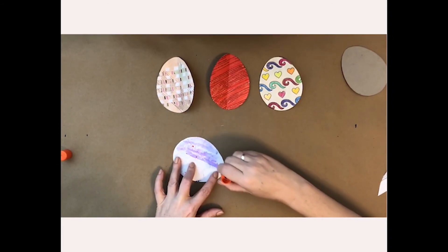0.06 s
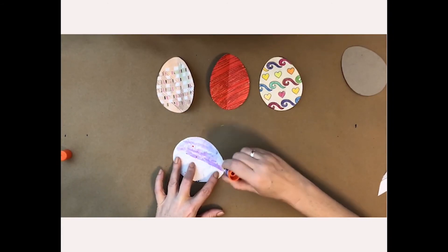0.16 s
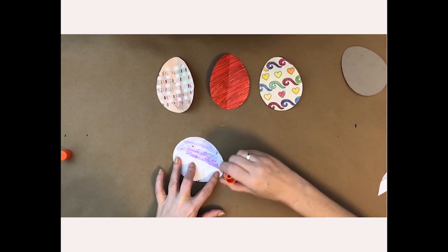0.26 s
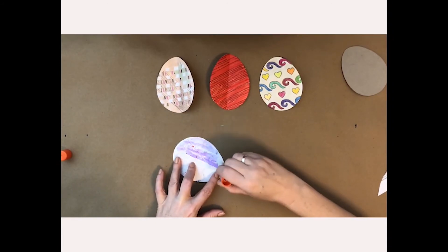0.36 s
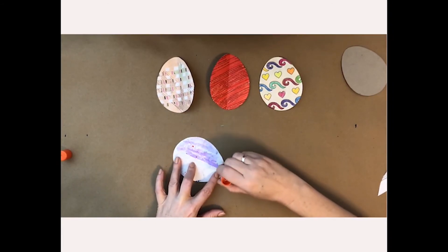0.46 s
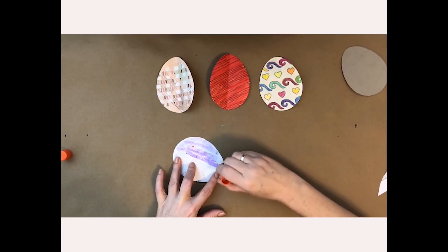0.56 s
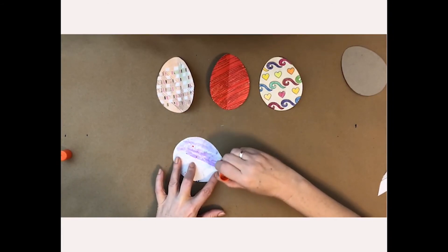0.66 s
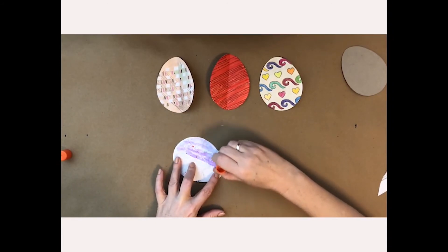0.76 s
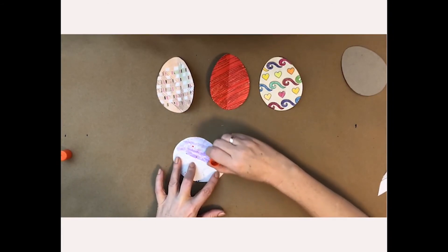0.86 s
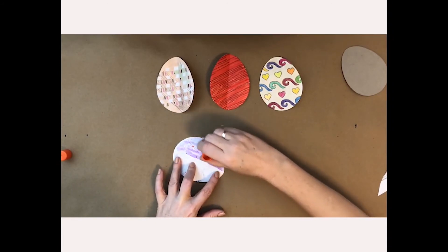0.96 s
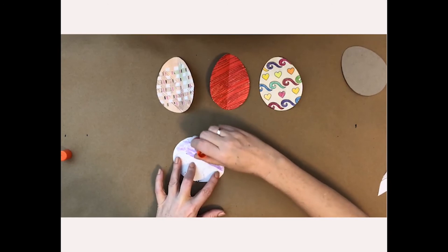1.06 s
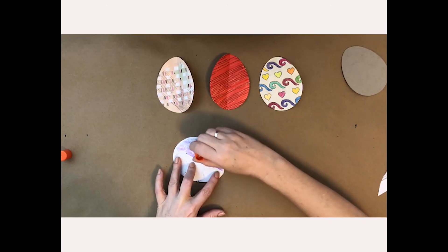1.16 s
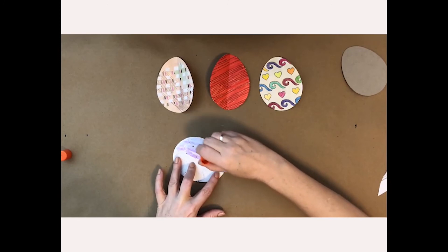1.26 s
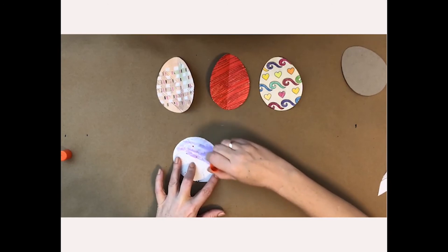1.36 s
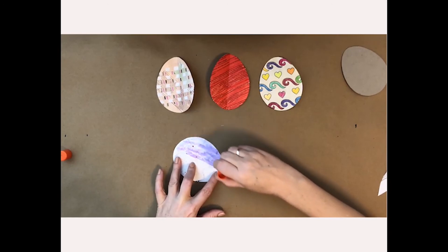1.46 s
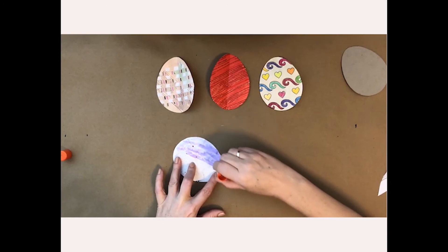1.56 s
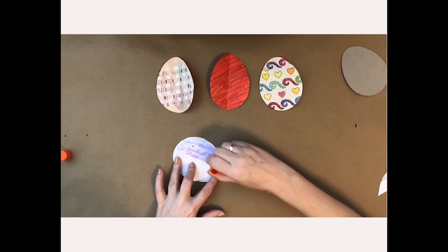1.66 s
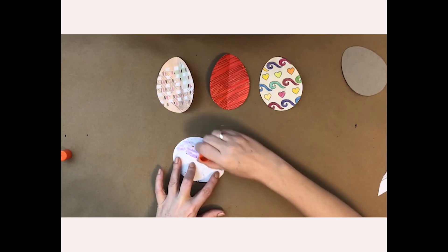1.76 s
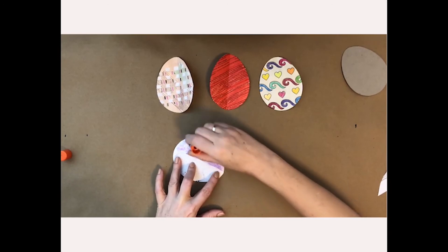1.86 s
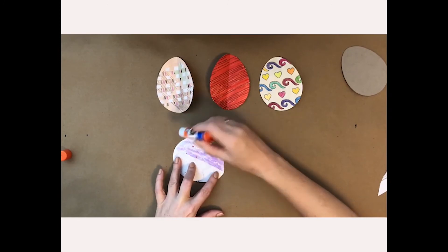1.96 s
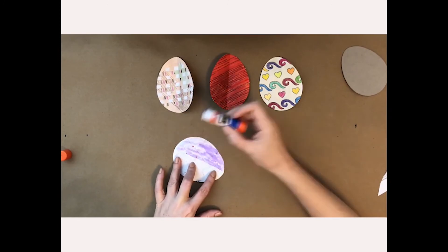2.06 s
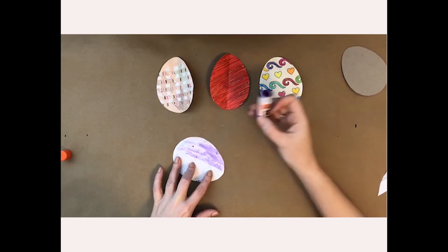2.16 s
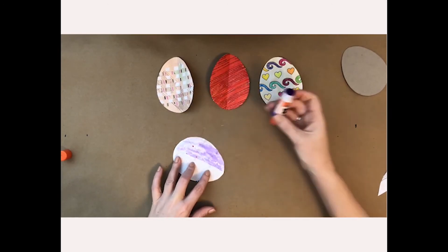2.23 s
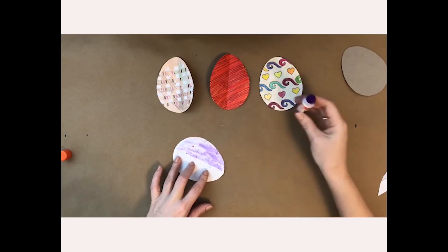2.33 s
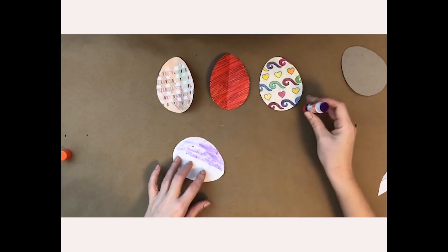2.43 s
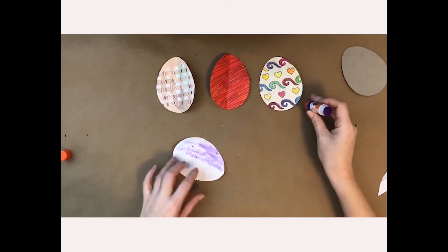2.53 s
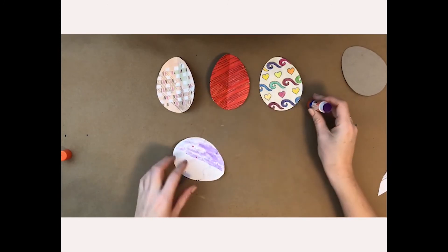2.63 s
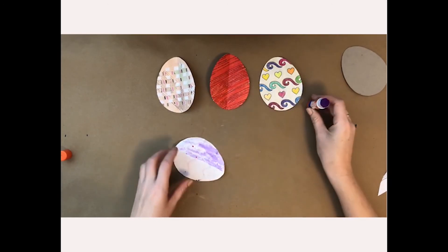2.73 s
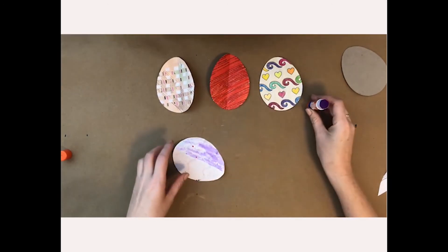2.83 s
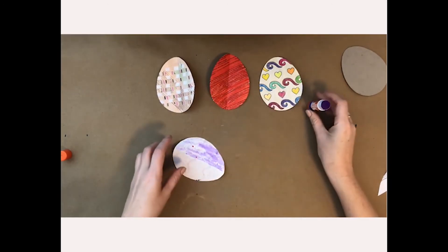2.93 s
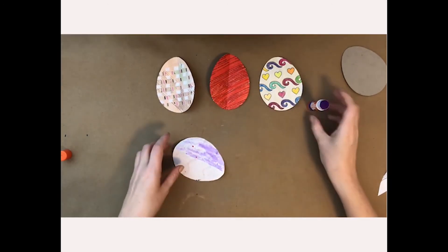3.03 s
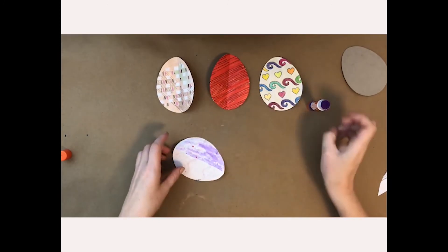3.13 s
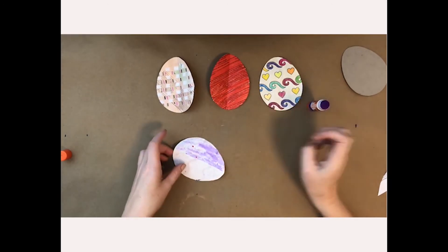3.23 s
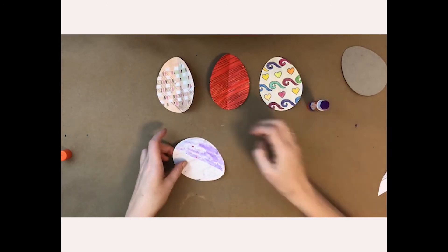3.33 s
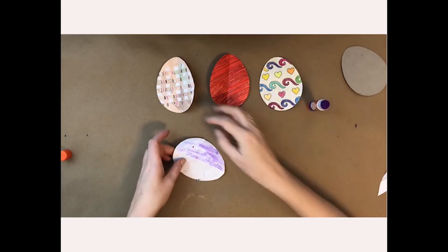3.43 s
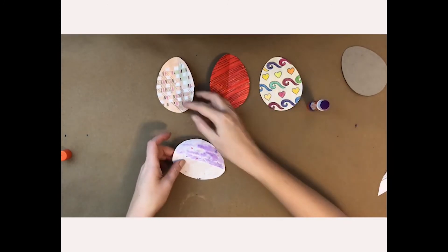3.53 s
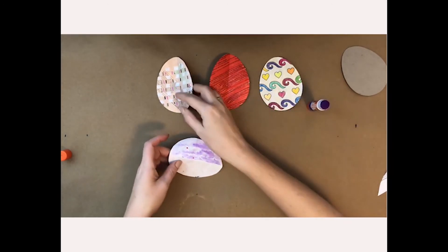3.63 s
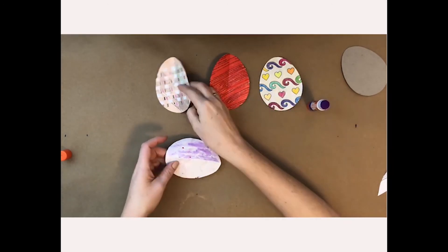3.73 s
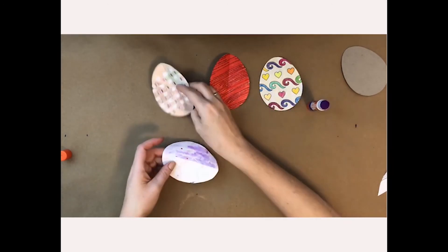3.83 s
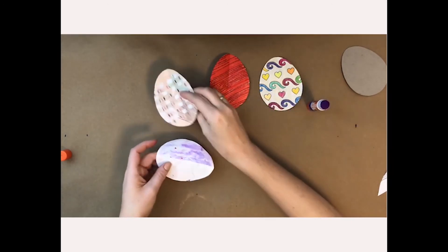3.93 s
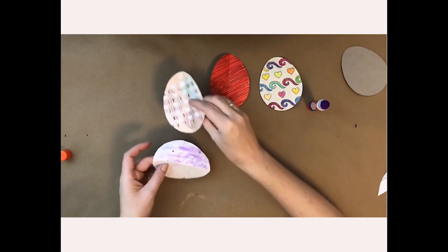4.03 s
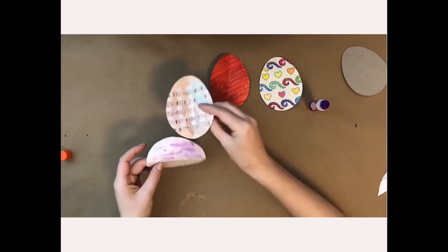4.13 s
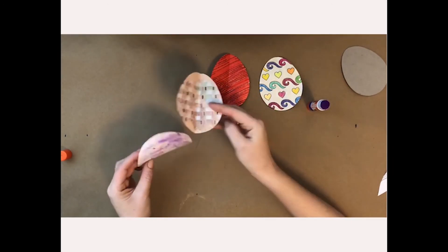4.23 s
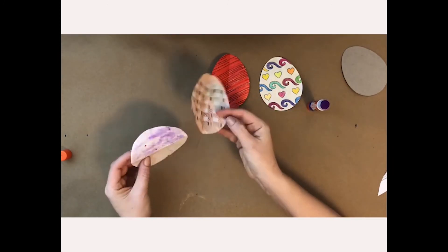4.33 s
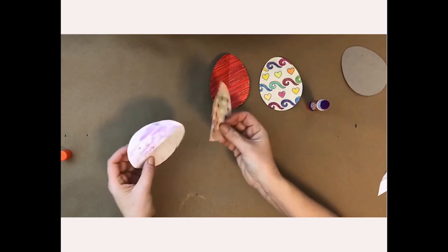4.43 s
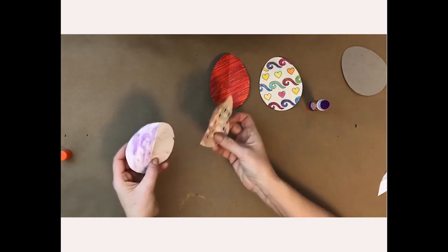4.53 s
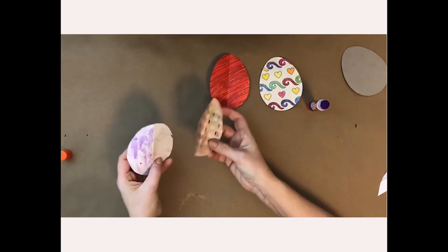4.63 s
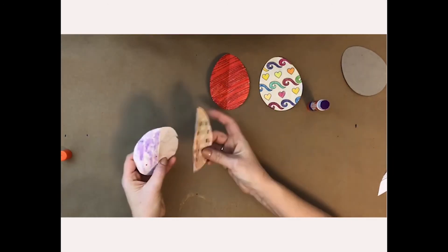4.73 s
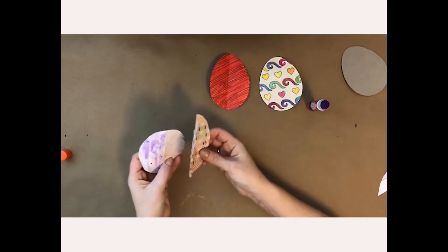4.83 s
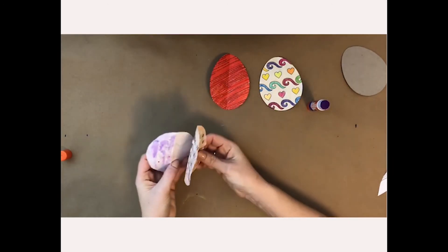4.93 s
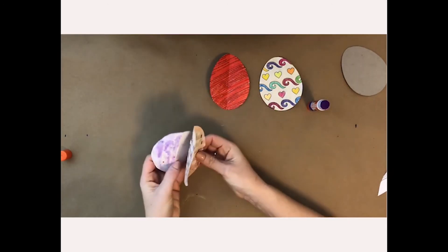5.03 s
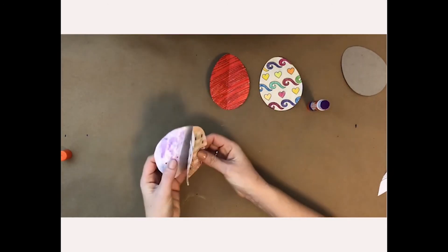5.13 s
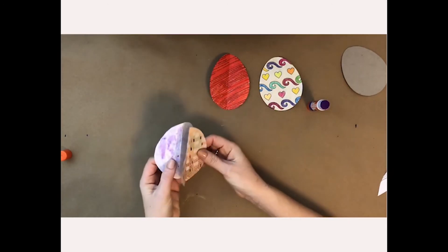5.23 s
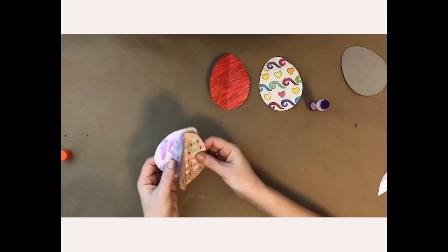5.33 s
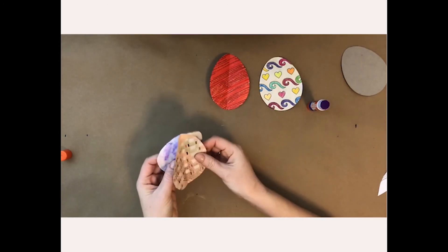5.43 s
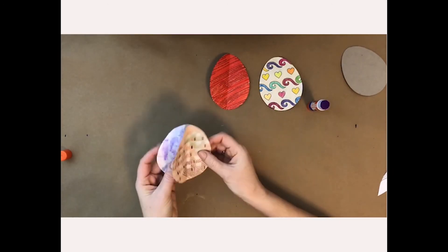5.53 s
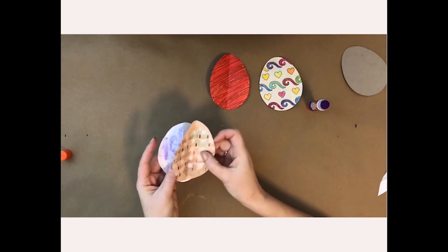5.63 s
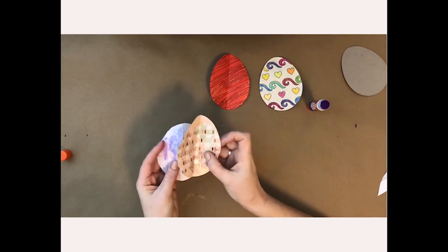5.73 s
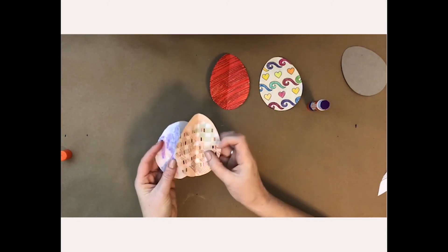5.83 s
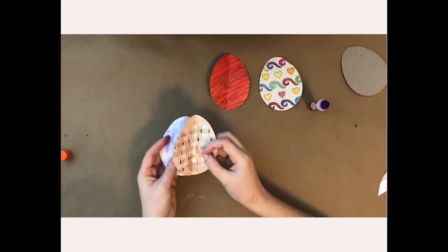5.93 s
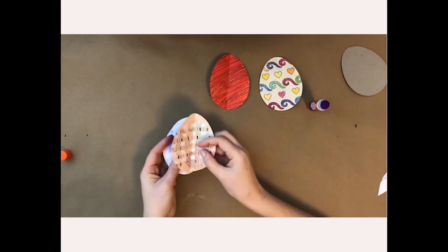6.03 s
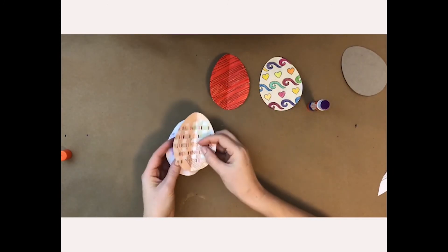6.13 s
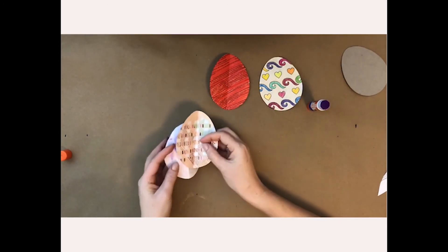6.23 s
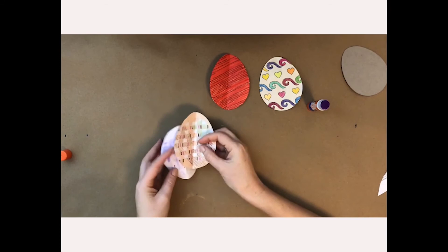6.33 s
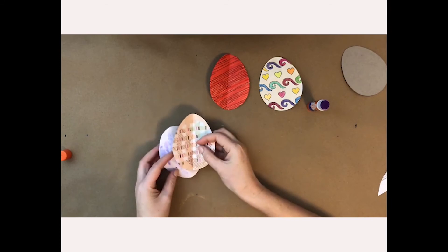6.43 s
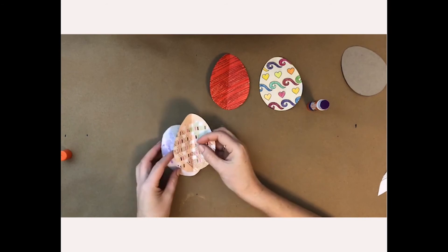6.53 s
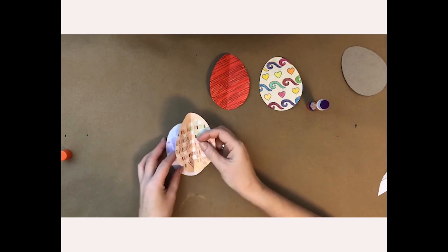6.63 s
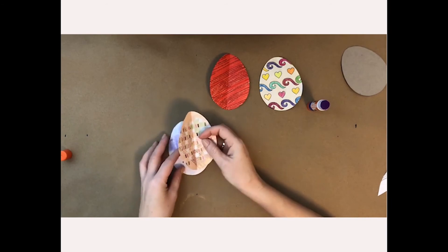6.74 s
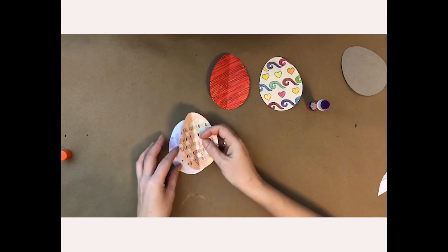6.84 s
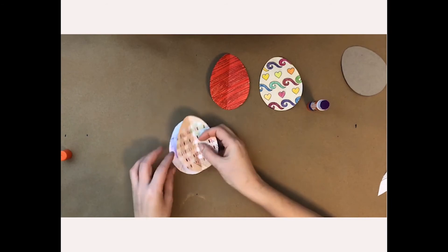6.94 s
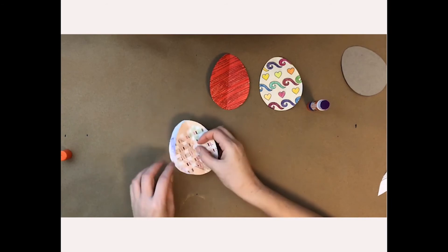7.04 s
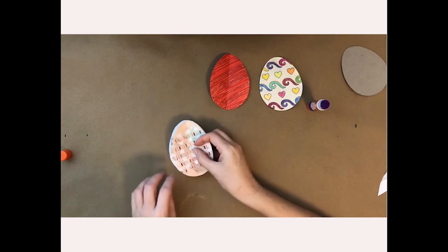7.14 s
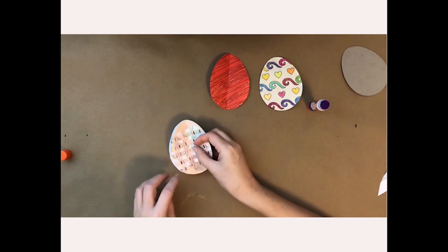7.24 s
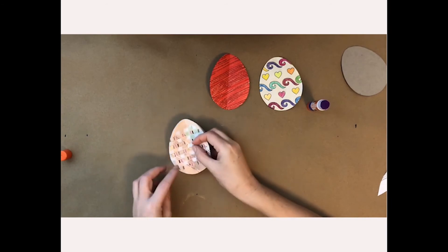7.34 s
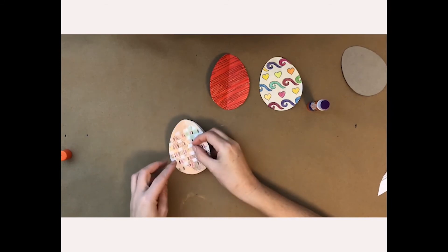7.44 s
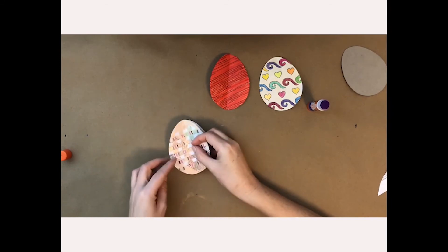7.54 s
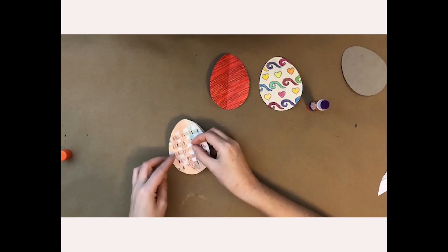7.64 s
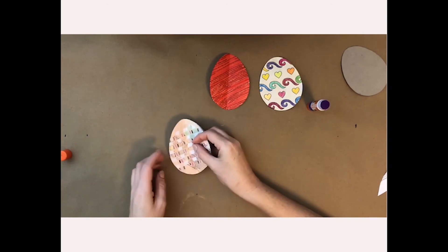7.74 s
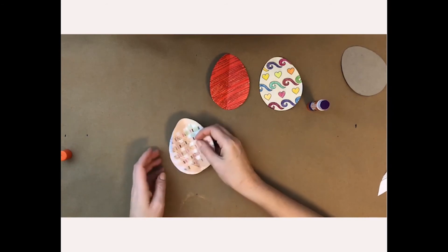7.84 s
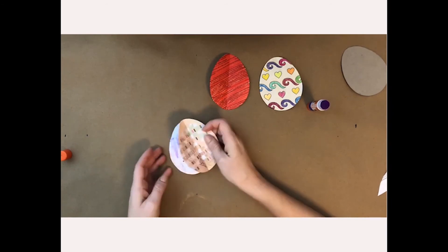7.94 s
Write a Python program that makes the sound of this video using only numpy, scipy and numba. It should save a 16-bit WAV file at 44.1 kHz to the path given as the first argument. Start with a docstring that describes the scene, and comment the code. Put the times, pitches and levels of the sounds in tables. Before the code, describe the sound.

In a quiet room, faint thuds of gluing give way to a loud plastic click on a tabletop, then folded paper slides and snaps.

```python
"""Paper craft at a table

In a small quiet room a glue stick is dabbed on folded paper, then stood on the table with a sharp knock.
The knock rings the table modes and a burst of coloured noise. Hands slide, lift and fit paper shapes:
strokes, crinkles, snaps and hollow taps are fibre clicks filtered as scrape, flex and edge hiss, plus
resonances of the sheet. Behind them lie soft air rumbles, hiss and faint tones."""
import sys
import numpy as np
from scipy import signal
from scipy.fft import rfft, irfft
from scipy.io import wavfile
from scipy.ndimage import uniform_filter1d
from numba import njit

SR = 44100
rng = np.random.default_rng(int(sys.argv[2]) if len(sys.argv) > 2 else 0)


def dump(signal):
    """Clip the signal to [-1, 1] and save it as 16-bit WAV at the path in sys.argv[1]."""
    limited = np.clip(np.atleast_2d(signal).T, -1, 1)
    pcm = np.round(limited * 32767).astype(np.int16)
    wavfile.write(sys.argv[1], SR, pcm)


N = 352359
TIME = np.arange(N) / SR

# Room tone and microphone hiss. Each row: frequency in Hz, relative density in dB.
HISS_SPECTRUM = [(15, -16), (28, 1.5), (62, -1.5), (97, 2.5), (180, -5), (330, -11), (440, -10), (600, -6),
                 (1000, -9.5), (1600, -11), (3200, -10.5), (5000, -10.5), (8500, -12.5), (15500, -15)]
# Faint tones in the room. Each row: frequency in Hz, middle level in dB.
ROOM_TONES = [(323, -76), (5329, -79), (6347, -83)]
# Air pushed by moving arms. Each row: centre in seconds, level in dB, half length in seconds.
WAFTS = [(2.0, -55, 0.16), (3.333, -55, 0.22), (4.76, -60.5, 0.18), (5.42, -60, 0.082), (7.575, -53, 0.086)]
# Spectrum of that air. Each row: frequency in Hz, relative density in dB.
AIR_SPECTRUM = [(15, -6), (28, -26), (45, -6.5), (70, -35.5), (105, -15), (170, -48.5), (400, -52.5)]
# Modes of the table top. Each row: frequency in Hz, relative level in dB, t60 in seconds.
TABLE_MODES = [(75.4, -9, 0.77), (101.2, 1, 0.33), (135.4, 0, 0.15), (149.8, 1, 0.22), (165, -4, 0.17),
               (185, -9, .22), (213, -10, 0.42), (270, -21, 0.15), (262, 0.5, 0.22), (330, -1.5, 0.23),
               (382, -2, 0.22), (518, -6, 0.3), (553, -3, 0.26), (586, -1, 0.15), (658, -2.5, 0.19),
               (737, -2, 0.053), (800, -5, 0.22), (837, -3.5, 0.19), (934, -11.5, 0.28), (1014, -9, 0.32),
               (1021, -9, 0.27), (1156, -15, 0.32), (1231, -7, .15), (1254, 6, 0.068), (1366, -7, 0.29),
               (1535, -18, 0.21), (1530, -13.5, 0.29), (1590, -2, 0.2), (1726, -9, 0.15),
               (1930, -11.5, 0.18)]
# Blows on the table: glue dabs, the stick set down, fingers.
# Each row: start in seconds, relative level in dB, spectral centre in Hz, reach in octaves.
TABLE_BLOWS = [(0.505, -45.5, 111, 0.57), (1.182, -37.5, 143, 0.65), (1.598, -42, 148, .58),
               (1.81, -52, 177, 0.32), (2.6761, -22, 850, 2.2), (3.093, -50.5, 143, 0.8),
               (4.233, -51.5, 380, 0.39), (4.986, -51.5, 620, 0.53), (5.416, -54, 370, 0.17),
               (6.773, -45, 108, 0.68), (7.573, -51.5, 90, 0.37)]
# The stick's hard base rocks flat. Each row: centre in seconds, peak in dB, pitch in Hz.
BASE_CLACKS = [(2.676, -2, 1330), (2.6767, -11.5, 2420), (2.6769, -7, 1090), (2.6836, -9, 884)]
# Dense ringing of stick and table. Each row: frequency in Hz, relative density in dB.
RATTLE_SPECTRUM = [(60, -49), (200, -32), (290, 4), (440, -8), (560, 9), (1550, 2), (2050, -8.5),
                   (2650, -8), (3600, -20), (5000, -22), (8000, -34), (15000, -49)]
# Surface scraping. Each row: frequency in Hz, relative density in dB.
SCRAPE_SPECTRUM = [(700, -14.5), (1400, -2), (2200, 6), (2750, 3), (3600, -1.5), (5000, 0), (6500, -8),
                   (10000, -15.5), (15000, -61.5)]
# Sheet flexing. Each row: frequency in Hz, relative density in dB.
FLEX_SPECTRUM = [(150, -7), (330, -21), (450, -7), (520, -2.5), (850, 3.5), (1500, 3.5), (2100, 4.5),
                 (3500, -30)]
# Edge hissing. Each row: frequency in Hz, relative density in dB.
EDGE_SPECTRUM = [(3500, -34.5), (5500, 4), (7500, 13), (9500, 10), (11500, -3), (15500, -5.5)]
# Resonances of stiff folded paper. Each row: frequency in Hz, width in Hz, relative level in dB.
SHEET_MODES = [(880, 24, -19), (974, 35, -28), (4860, 314, -23)]
# Strokes of hand or paper over paper. Each row: time of greatest speed in seconds, relative level in dB,
# attack in seconds, release in seconds, relative flex in dB, relative edge hiss in dB,
# bent-sheet resonance at greatest speed in Hz.
STROKES = [(2.0, -52, 0.05, 0.18, -14, -4, 3800), (2.438, -44.5, 0.027, 0.027, -10, -9.5, 3830),
           (3.025, -49, 0.063, 0.011, -18, -1, 2900), (3.106, -37, .025, 0.034, -11, -8, 2540),
           (3.248, -46.5, 0.018, 0.045, -10, -10, 2520), (3.43, -47.5, 0.08, 0.18, -22, -7.5, 2580),
           (3.602, -43.5, .07, 0.1, -9, -7.5, 2250), (3.795, -41.5, 0.078, 0.069, -17, -4.5, 2270),
           (3.935, -48, 0.077, 0.13, -1, -4, 2080), (4.115, -45.5, 0.021, 0.028, 0.5, -6.5, 2620),
           (4.4, -45.5, 0.082, 0.12, -2, -0.5, 2320), (4.482, -35, 0.033, 0.033, -4.5, -5, 4740),
           (4.534, -36.5, 0.02, 0.044, -2.5, -7, 2480), (4.927, -38, 0.021, 0.013, -22, -14, 3180),
           (5.193, -32.5, .022, 0.013, -7, -4.5, 4900), (5.29, -48, 0.022, 0.036, 3, -16, 2300),
           (5.54, -41, 0.04, 0.1, -8, -7, 4380), (6.227, -32.5, 0.019, 0.029, -27, -9, 2480),
           (6.324, -36.5, 0.027, 0.033, -8.5, -11, 1700), (6.378, -34, 0.032, 0.035, -9, -5.5, 2400),
           (6.44, -38.5, 0.0096, 0.026, -13, -3.5, 2330), (6.527, -40.5, 0.0082, .03, -7, -7.5, 2240),
           (6.596, -38, 0.049, 0.066, -19, -7.5, 2510), (6.694, -39, 0.042, 0.029, -28, -8, 2600),
           (6.773, -40.5, 0.044, 0.025, -19, -5, 2800), (6.884, -45, 0.036, 0.048, -10, -7, 1870),
           (6.975, -46.5, .06, 0.051, -16, -8, 2340), (7.119, -47.5, 0.021, 0.025, -19, -10, 2170),
           (7.265, -54.5, 0.064, 0.049, -15, -6, 2320), (7.61, -55.5, .015, 0.021, -2, -18, 2300),
           (7.915, -44, 0.12, 0.1, -6, -4.5, 2560)]
# Fingers rubbing the held sheets. Each row: time in seconds, relative level in dB.
GRIP_LEVELS = [(4.2, -44.5), (4.3, -49.5), (4.6, -46.5), (4.7, -48.5), (4.82, -46.5), (5.4, -46.5),
               (5.78, -50.5), (6.06, -51.5), (6.13, -46), (6.5, -53.5), (6.85, -54), (7.4, -67)]
# Snaps of a crease or catching edge. Each row: peak in seconds, relative level in dB, fall in ms, ring in Hz.
SNAPS = [(1.188, -46, 3.6, 2300), (2.6695, -31, 7, 2630), (3.07, -36, 9.1, 2670), (3.573, -40, 3.7, 2150),
         (4.2035, -42, 2.5, 1230), (4.2127, -30, 3.4, 2780), (5.1895, -32, 4.6, 2630),
         (6.0249, -28.5, 4, 2120), (6.0272, -23.5, 1.6, 2340), (6.074, -32, 8.4, 2560),
         (6.304, -41, 7.1, 1510), (6.762, -34.5, 13, 3000)]
# Hollow taps of a sheet on table or sheet. Each row: peak in seconds, relative level in dB, ring in Hz.
TAPS = [(3.377, -49.5, 625), (3.392, -42, 586), (3.736, -40, 800), (3.987, -36.5, 870), (4.214, -37, 910),
        (4.653, -43.5, 654), (5.151, -38.5, 860), (5.272, -39.5, 1170), (5.286, -41, 960),
        (5.315, -48, 870), (5.684, -43.5, 810), (6.158, -44.5, 1650), (6.445, -35.5, 660),
        (6.625, -36.5, 593), (6.661, -48, 600), (6.764, -32.5, 1000)]

SNAP_RISE_MS, SNAP_SHARES_DB = 0.3, (-3, -22, -8.5)  # scrape, flex, edge
TAP_RISE_MS, TAP_FALL_MS, TAP_SHARES_DB = 2.4, 9, (-12, -2)  # scrape, flex
GRIP_FLEX_DB, GRIP_EDGE_DB, GRIP_HZ = -4, -6.5, 2620
GRIP_BEND_OCTAVES, GRIP_BEND_RATE_HZ = 0.2, 8  # rms wander of the held sheet's resonance
STROKE_BEND_SAG = 0.23  # share by which the resonance sinks as a stroke slows to rest
CRINKLES_PER_S, CRINKLE_OVER_GRIP_DB, CRINKLE_SCATTER_DB = 24, 3.5, 4
CRINKLE_FALL_MS, CRINKLE_LOW_HZ, CRINKLE_HIGH_HZ = 4.1, 910, 4600


def undb(db):
    """Decibels to gain."""
    return 10 ** (np.asarray(db) / 20)


def unit(x):
    """Scale to rms 1."""
    return x / np.sqrt(np.mean(x ** 2))


def convolve(x, response):
    """Pass x through an impulse response, keeping its length."""
    return signal.oaconvolve(x, response)[:len(x)]


def add(out, start_s, sound):
    """Mix a sound into out from start_s on."""
    start = int(round(start_s * SR))
    out[start:start + len(sound)] += sound[:max(N - start, 0)]


def colour(x, points, size=4096):
    """Minimum-phase filter through (Hz, dB) points; the result has rms 1."""
    hz, db = np.transpose(points)
    bins_hz = np.arange(size // 2 + 1) * SR / size
    log_gain = np.log(undb(np.interp(np.log(bins_hz + 1), np.log(hz), db)))
    # folding the cepstrum makes the filter causal
    cepstrum = irfft(log_gain)[:size // 2]
    cepstrum[1:] *= 2
    return unit(convolve(x, irfft(np.exp(rfft(cepstrum, size)))))


def walk(rate_hz):
    """Random levels joined by ramps, rate_hz of them a second, scaled to rms 1."""
    hold = max(int(SR / rate_hz), 1)
    steps = np.repeat(rng.standard_normal(N // hold + 1), hold)
    return unit(uniform_filter1d(steps, hold)[:N])


def fade(t, t60_s):
    """Exponential decay, 60 dB down after t60_s."""
    return np.exp(-np.log(1000) * t / t60_s)


@njit
def resonance(x, hz, q):
    """State-variable band-pass with a movable centre; white noise keeps its rms."""
    y, band, low = np.empty(len(x)), 0., 0.
    for i in range(len(x)):
        g = np.tan(np.pi * hz[i] / SR)
        v = (band + g * (x[i] - low)) / (1 + g * (g + 1 / q))
        band = 2 * v - band
        low = low + 2 * g * v
        y[i] = v / np.sqrt(g * q)
    return y


def room_tone(hiss_db=-54, waver_db=3.5, waver_rate_hz=8.2):
    """Steady coloured hiss with a few faint sines of wavering level."""
    tones = np.zeros(N)
    for hz, db in ROOM_TONES:
        level = undb(db + waver_db * walk(waver_rate_hz))
        tones += level * np.sqrt(2) * np.sin(2 * np.pi * hz * TIME)
    return undb(hiss_db) * colour(rng.standard_normal(N), HISS_SPECTRUM) + tones


def wafts():
    """An arm sweeping by pushes air: noise with most weight in the bass under a Gaussian swell."""
    level = sum(undb(db) * np.exp(-((TIME - s) / half_s) ** 2) for s, db, half_s in WAFTS)
    return level * colour(rng.standard_normal(N), AIR_SPECTRUM)


def room(x, t60_s=0.23, wet_db=-3, gap_s=0.0029):
    """Direct sound plus the short diffuse noise tail of a furnished room."""
    t = TIME[:SR // 2]
    tail = rng.standard_normal(len(t)) * fade(t, t60_s) * (t > gap_s)
    wet = undb(wet_db)
    return (x + wet * convolve(x, tail / np.linalg.norm(tail))) / np.hypot(1, wet)


def low_cut(x, hz=74):
    """A high-pass keeps the blows on the table and the stick's ringing clear of deep rumble."""
    return signal.sosfilt(signal.butter(4, hz, "high", fs=SR, output="sos"), x)


def drag(s=1.5, half_s=0.029, db=-64, hz=232, q=11.0):
    """Tacky glue drags on the paper with a faint low groan: resonant noise."""
    groan = resonance(rng.standard_normal(N), np.full(N, float(hz)), q)
    return undb(db) * np.exp(-((TIME - s) / half_s) ** 2) * groan


def table(split=0.02, twin_db=-5):
    """Every blow rings the same modes: a soft pad reaches only the low ones, hard plastic nearly all."""
    out, t = np.zeros(N), TIME[:SR // 2]
    mode_hz, mode_db, t60_s = np.transpose(TABLE_MODES)[:, :, None]
    # higher up the modes crowd, so each beats with a close neighbour
    twin_hz = mode_hz * (1 + split * rng.standard_normal(mode_hz.shape))
    twin_gain = undb(twin_db) * np.minimum(mode_hz / 700, 1)
    sign, twin_sign = rng.choice([-1, 1], (2,) + mode_hz.shape)
    modes = sign * np.sin(2 * np.pi * mode_hz * t)
    modes = modes + twin_gain * twin_sign * np.sin(2 * np.pi * twin_hz * t)
    modes *= undb(mode_db) * fade(t, t60_s)
    for s, db, centre_hz, octaves in TABLE_BLOWS:
        reach = np.exp(-0.5 * (np.log2(mode_hz / centre_hz) / octaves) ** 2)
        onset = 1 - np.exp(-t * centre_hz)
        add(out, s, undb(db) * (reach * modes).sum(axis=0) * onset)
    return out


def stick(rattle_db=-20, rattle_t60_s=0.22, tail_db=-47, tail_t60_s=0.79):
    """The plastic base clacks as short wavelets; dense ringing, as coloured noise, dies in two slopes."""
    out, t = np.zeros(N), TIME[:SR // 2]
    for s, db, hz in BASE_CLACKS:
        u = (np.pi * hz * (TIME - s)) ** 2
        out += undb(db) * (1 - 2 * u) * np.exp(-np.minimum(u, 50))
    dying = undb(rattle_db) * fade(t, rattle_t60_s) + undb(tail_db) * fade(t, tail_t60_s)
    add(out, BASE_CLACKS[0][0], colour(rng.standard_normal(len(t)), RATTLE_SPECTRUM) * dying)
    return out


def fibres(rate_hz=3000, spread_db=3.0, smooth=0.56):
    """Paper fibres catch and let go: random clicks of unequal size over a smooth hiss."""
    size = undb(spread_db * np.minimum(rng.exponential(size=N), 4.5))
    sign = rng.choice([-1, 1], N)
    clicks = size * sign * (rng.random(N) < rate_hz / SR)
    return unit(unit(clicks) + smooth * rng.standard_normal(N))


def sheet(x, ring_db=-3):
    """The folded sheet lifts its own resonances out of the friction."""
    rings = np.zeros(len(x))
    for hz, width_hz, db in SHEET_MODES:
        rings += undb(db) * signal.lfilter(*signal.iirpeak(hz, hz / width_hz, fs=SR), x)
    return x + undb(ring_db) * rings


def friction(gains, fibre_clicks):
    """One stream of fibre clicks, heard as scrape, flex and edge hiss, each with its own gain in time."""
    clicks = sheet(fibre_clicks)
    spectra = (SCRAPE_SPECTRUM, FLEX_SPECTRUM, EDGE_SPECTRUM)
    return sum(gain * colour(clicks, points) for gain, points in zip(gains, spectra))


def swell(t, attack_s, release_s):
    """A hand speeds up and slows down again; 1 at t = 0."""
    return np.exp(-np.minimum((t / np.where(t < 0, attack_s, release_s)) ** 2, 50))


def grip(t):
    """How hard the fingers rub the held sheets at time t, as a gain."""
    s, db = np.transpose(GRIP_LEVELS)
    return undb(np.interp(t, s, db)) * (t > s[0]) * (t < s[-1])


def crinkles():
    """Tiny random snaps of the held sheets, louder under a firmer grip, as rows like SNAPS."""
    start_s, end_s = GRIP_LEVELS[0][0], GRIP_LEVELS[-1][0]
    count = int(CRINKLES_PER_S * (end_s - start_s))
    when, size, pitch = rng.random((3, count))
    s = start_s + when * (end_s - start_s)
    db = np.interp(s, *np.transpose(GRIP_LEVELS)) + CRINKLE_OVER_GRIP_DB
    db += CRINKLE_SCATTER_DB * (2 * size - 1)
    hz = CRINKLE_LOW_HZ * (CRINKLE_HIGH_HZ / CRINKLE_LOW_HZ) ** pitch
    return list(zip(s, db, np.full(count, CRINKLE_FALL_MS), hz))


def flicks(ring_db=-3, ring_q=6.5, lead_s=0.02):
    """An edge catches and lets go, ringing its patch of paper: a snap is mostly scrape, a tap mostly flex."""
    gains, rings = np.zeros((3, N)), np.zeros(N)
    ms = (TIME[:SR // 5] - lead_s) * 1000
    clicks = fibres(rate_hz=6100, spread_db=3.0, smooth=0.29)
    noise = rng.standard_normal(N)
    events = [(s, db, SNAP_RISE_MS, fall_ms, hz, SNAP_SHARES_DB)
              for s, db, fall_ms, hz in SNAPS + crinkles()]
    events += [(s, db, TAP_RISE_MS, TAP_FALL_MS, hz, TAP_SHARES_DB) for s, db, hz in TAPS]
    for s, db, rise_ms, fall_ms, hz, shares_db in events:
        rise = (np.minimum(ms, 0) / rise_ms) ** 2
        fall = np.maximum(ms, 0) / fall_ms
        shape = undb(db) * np.exp(-rise - fall)
        for gain, share_db in zip(gains, shares_db):
            add(gain, s - lead_s, undb(share_db) * shape)
        burst = shape * noise[int(s * SR):][:len(ms)]
        ring = resonance(burst, np.full(len(ms), float(hz)), ring_q)
        add(rings, s - lead_s, undb(ring_db) * ring)
    return friction(gains, clicks) + rings


def friction_shares(flex_db, edge_db):
    """Gains of scrape, flex and edge hiss in sliding, as a column."""
    return undb([-4.5, flex_db - 3, edge_db - 2])[:, None]


def sliding(bend_db=-9.0, bend_q=5.1, uneven_db=0.32, shift_db=2.0, uneven_rate_hz=50):
    """Strokes and gripping fingers glide unevenly; each stroke rings the bent sheet, higher as it speeds up."""
    clicks = fibres()
    held = grip(TIME)
    power = (friction_shares(GRIP_FLEX_DB, GRIP_EDGE_DB) * held) ** 2
    held_hz = GRIP_HZ * 2 ** (GRIP_BEND_OCTAVES * walk(GRIP_BEND_RATE_HZ))
    bend = held * resonance(fibres(), held_hz, bend_q)
    for s, db, attack_s, release_s, flex_db, edge_db, hz in STROKES:
        near = slice(*np.searchsorted(TIME, [s - 3 * attack_s, s + 3 * release_s]))
        speed = swell(TIME[near] - s, attack_s, release_s)
        level = undb(db) * speed
        power[:, near] += (friction_shares(flex_db, edge_db) * level) ** 2
        bent_hz = hz * (1 - STROKE_BEND_SAG * (1 - speed))
        bend[near] += level * resonance(clicks[near], bent_hz, bend_q)
    # the pressure wavers, and the colour shifts as the point of contact moves
    pressure_db = uneven_db * walk(uneven_rate_hz)
    contact_db = shift_db * np.array([walk(uneven_rate_hz) for _ in range(4)])
    waver = undb(pressure_db + contact_db)
    return friction(np.sqrt(power) * waver[:3], clicks) + undb(bend_db) * waver[3] * bend


def scene():
    """Everything reaches one microphone, the same in both channels."""
    background = room_tone() + wafts()
    glue_and_table = drag() + low_cut(table() + stick())
    paper = room(sliding() + flicks())
    mono = background + glue_and_table + paper
    return np.array([mono, mono])


def record(dry, top_hz=15750):
    """The recorder cuts the top with a steep low-pass."""
    return signal.sosfilt(signal.ellip(12, 0.1, 70, top_hz, fs=SR, output="sos"), dry)


dry = scene()
out = record(dry)
dump(out)
```